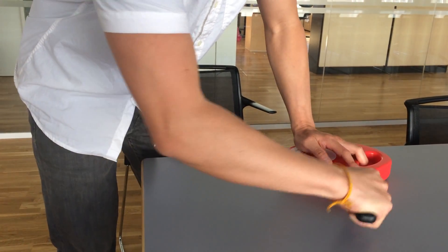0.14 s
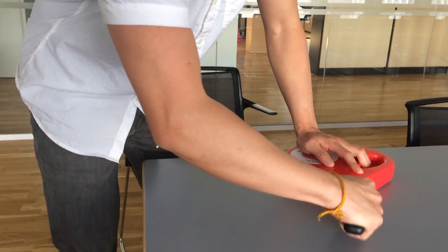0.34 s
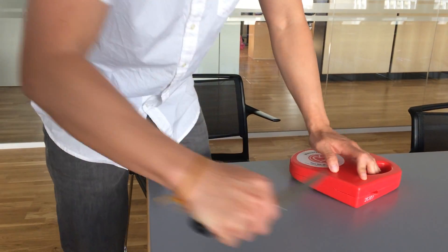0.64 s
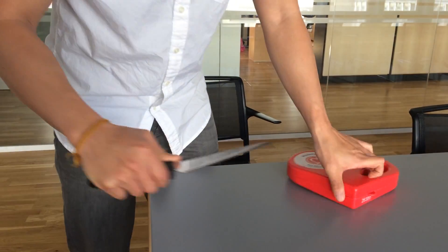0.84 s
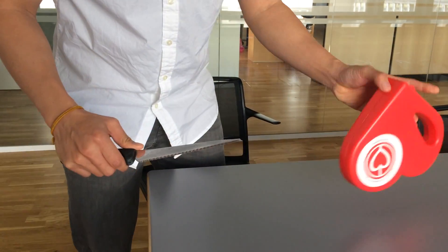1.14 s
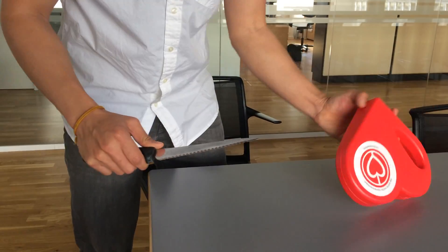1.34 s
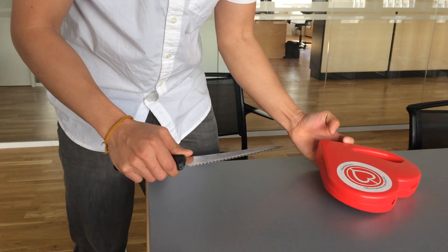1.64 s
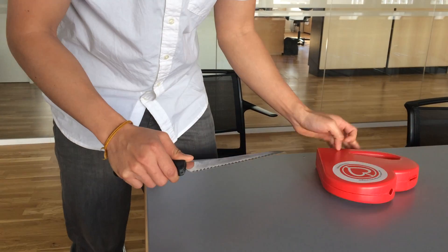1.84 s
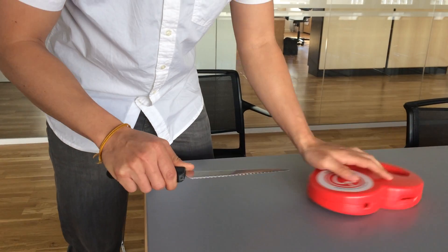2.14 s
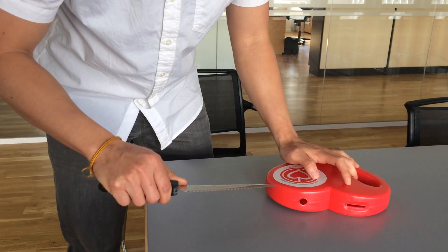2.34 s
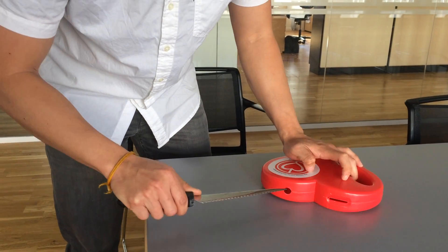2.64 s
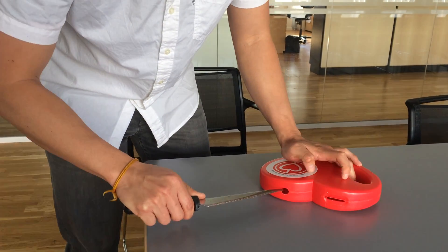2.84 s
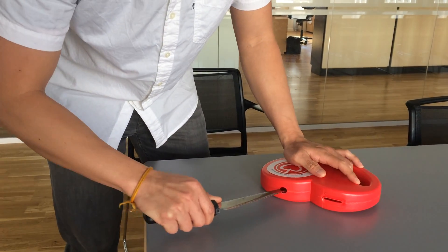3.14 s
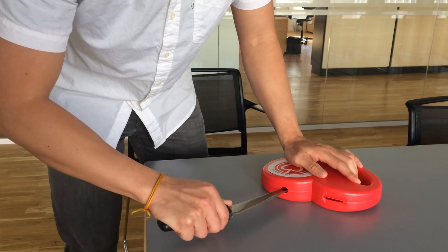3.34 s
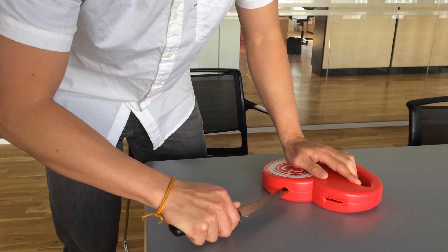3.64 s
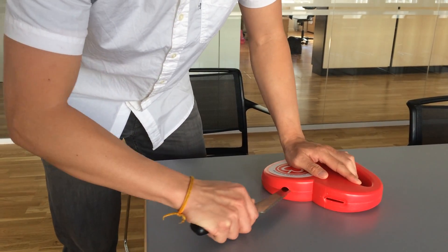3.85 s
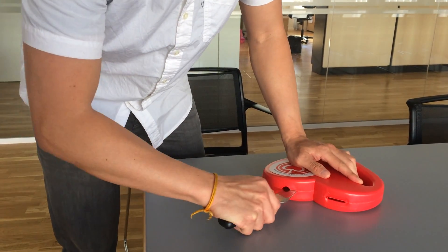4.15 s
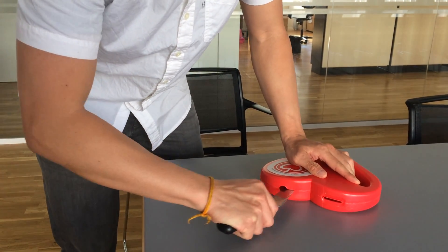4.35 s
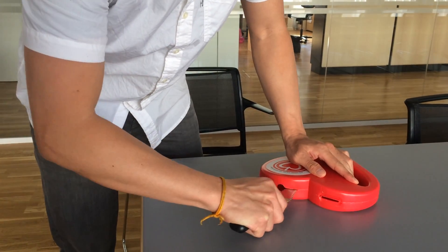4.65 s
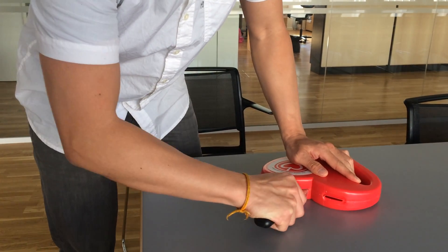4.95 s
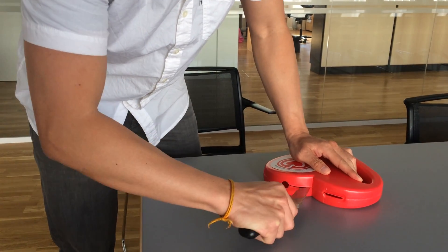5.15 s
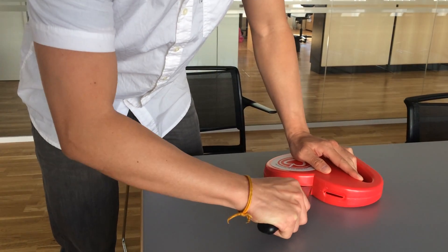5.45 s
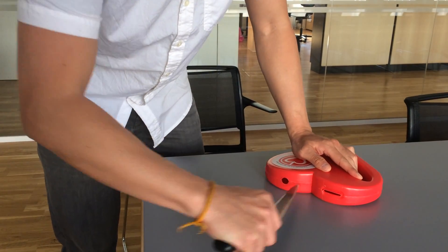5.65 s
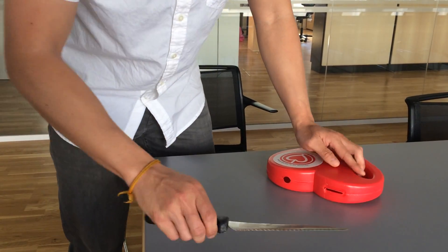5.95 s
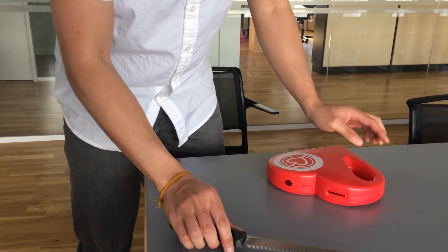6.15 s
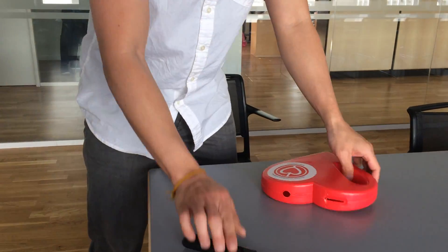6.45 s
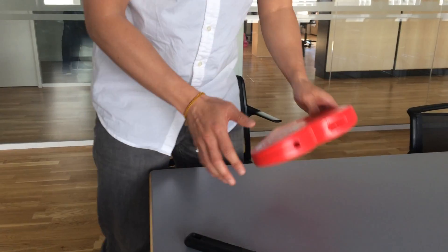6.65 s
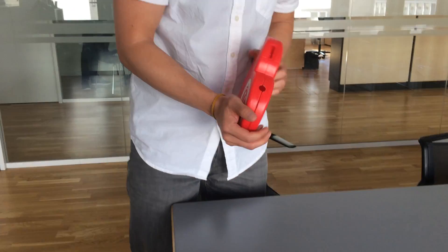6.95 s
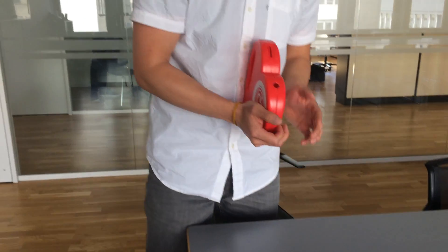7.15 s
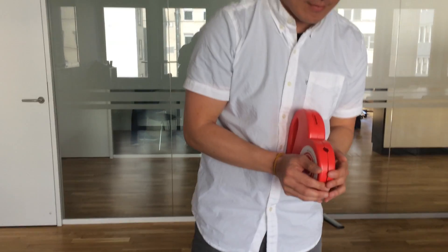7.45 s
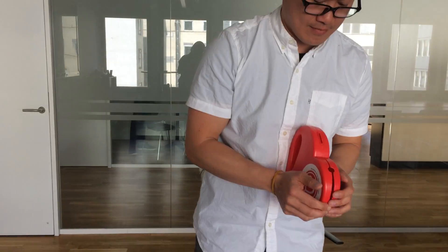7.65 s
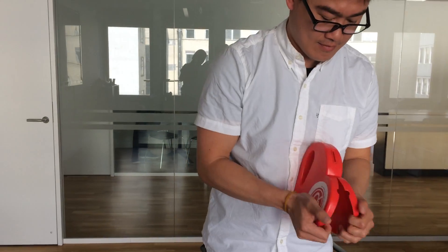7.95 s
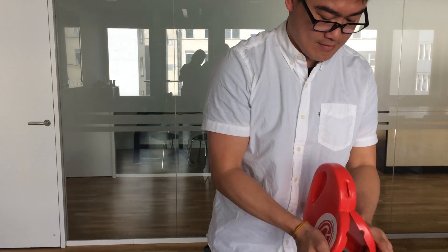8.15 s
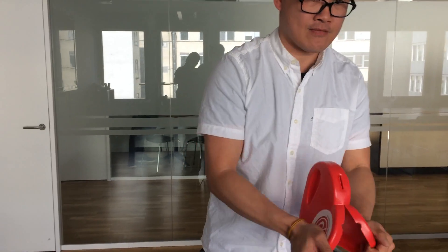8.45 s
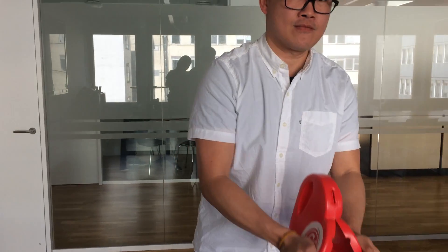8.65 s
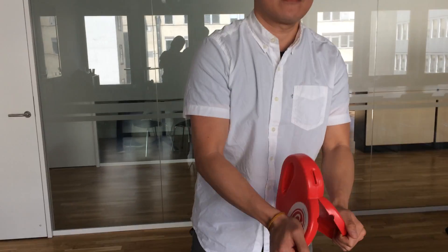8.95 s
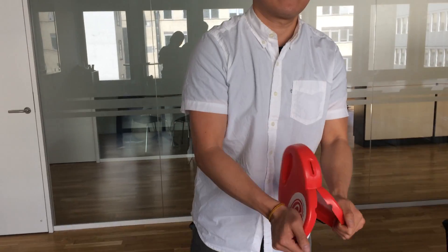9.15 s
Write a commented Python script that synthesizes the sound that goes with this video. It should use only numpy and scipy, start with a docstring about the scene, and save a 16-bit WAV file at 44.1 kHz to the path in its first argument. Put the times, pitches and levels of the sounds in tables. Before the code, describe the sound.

Close, dry sound in a quiet hard-walled office with faint low ventilation. From 0 to 0.6 s a serrated blade makes short gritty rasps in a hollow plastic sharpener, with clicks; the last pull is strongest and brightest. The case taps the table at 1.2, thuds hard at 1.45 and rocks in a rapid hollow clatter from 1.9 to 2.1. A soft swish follows at 2.3. Near-quiet until a faint creak and thin squeal around 3.2-3.4. At 3.9 the blade clacks home with a strong buzzing shudder, then soft uneven scrapes and dull bumps continue to 5.7, sharper at 5.17 and 5.72. A tap comes at 5.96; the knife drops and clanks at 6.4-6.5, the case drags briefly at 6.6 and clicks at 6.83. Faint finger rustles, small clicks and a strained hum lead to a startlingly loud, sharp plastic snap at 8.65, echoing briefly before quiet air.

```python
"""An office table in a hard-walled room: a serrated knife rasps in short strokes through a hollow plastic sharpener.
The case is knocked down, the blade catches and scrapes again, the knife is dropped, and the shells snap apart.
Random grains drive resonances for friction; impacts are a crack, a rattle and decaying modes;
the echo is decaying noise, the ventilation shaped noise."""
import sys
import numpy as np
from scipy import signal
from scipy.fft import rfft, irfft, next_fast_len
from scipy.io import wavfile
from scipy.ndimage import uniform_filter1d, minimum_filter1d

SR = 44100
rng = np.random.default_rng(int(sys.argv[2]) if len(sys.argv) > 2 else 0)


def log_audio(samples):
    """Write samples as a 16-bit WAV file to the path given in sys.argv[1]."""
    # one column per channel
    frames = np.atleast_2d(samples).T
    # limit to full scale, then quantise
    limited = np.clip(frames, -1, 1)
    pcm = np.round(limited * 32767).astype(np.int16)
    wavfile.write(sys.argv[1], SR, pcm)


N = 410571
TIME = np.arange(N) / SR

# ventilation spectrum: freq_hz, density_db_per_hz
AIR_SPECTRUM = [(25, -13.5), (65, 2), (130, 1.5), (330, -13.5), (750, -21), (2500, -30), (5000, -35),
                (16000, -40)]
AIR_DB = -58.5
# reverberation: freq_hz, t60_s
ROOM_T60 = [(100, 1), (500, 0.62), (2500, 0.59), (7000, 0.37)]

# faint creaks as the blade enters the slot, before CREAK_GAIN_DB: peak_s, length_s, level_db
CREAKS = [(3.22, 0.2, -58), (3.181, 0.032, -54.5), (3.246, 0.03, -51.5), (3.278, 0.037, -48)]
# creak resonances: freq_hz, width_hz, level_db
CREAK_MODES = [(990, 100, -2), (1750, 270, -0.5), (2540, 1200, -12), (3180, 73, -11)]
# thin squeal ending the creak, before CREAK_GAIN_DB: peak_s, length_s, level_db
SQUEALS = [(3.33, 0.59, -70.5)]
SQUEAL_HZ, SQUEAL_WIDTH_HZ = 1793, 130
CREAK_GAIN_DB = 5.0   # direct sound only

# hands, cloth or blade slide over the case, or the case over the table: peak_s, length_s, level_db
SLIDES = [(.53, 0.2, -46), (.965, 0.11, -53), (2.285, 0.23, -36.5), (2.52, 0.27, -58.5), (2.73, 0.21, -60),
          (6.61, 0.21, -55), (7.76, 0.076, -62), (7.99, 0.074, -59.5)]
# sliding spectrum: freq_hz, density_db_per_hz
SWISH_SPECTRUM = [(200, -16), (450, -10), (750, -15), (1150, -11), (6000, -22), (16000, -32)]
# fingers shift their grip on the lifted case: peak_s, length_s, level_db
FUMBLING = [(7.6, 5.3, -71)]
# the hollow case hums as its seam gives: peak_s, length_s, level_db
STRAINS = [(7.88, 0.14, -53)]
# hum resonances: freq_hz, width_hz, level_db
STRAIN_MODES = [(562, 39.4, 0.5), (1447, 300, -14)]
SPEED_WIDTH, SPEED_FLATNESS = 0.38, 3.2   # half width as share of length; exponent, above 2 = flat-topped

# hard landing, or blade home against its stop, shudders the case: start_s, level_db
SHUDDERS = [(.255, -33), (.277, -50), (1.47, -32.5), (1.97, -31), (3.915, -19.5)]
# case drags on the table with a low groan: peak_s, length_s, level_db
DRAGS = [(6.6, 0.11, -45)]
SHUDDER_RISE_S, SHUDDER_DECAY_S, JUDDER_LOWEST_HZ = 0.0008, 0.022, 198

# case lands and rocks to rest; thump is relative to the middle: start_s, level_db, thump_db, favoured_hz
KNOCKS = [(1.229, -32, -14, 640), (1.4441, -20.5, -4.5, 1440), (1.4497, -19.5, -6.5, 564),
          (1.468, -35.5, 4, 1100), (1.52, -31.5, 1.5, 900), (1.575, -45, 6.5, 1100),
          (1.734, -50.5, -9, 1089), (1.894, -27, -4.5, 1110), (1.915, -32, -7, 890),
          (1.9495, -19.5, 1, 414), (1.955, -21.5, -12, 614), (2.006, -23.5, 1, 437), (2.045, -25.5, 1, 577),
          (2.068, -35.5, 4.5, 706), (2.084, -44, 2, 590)]
# table-top resonances: freq_hz, level_db
TABLE_MODES = [(88, -12.5), (192.5, 0), (229, 0), (290, -5.5), (345, 1.5), (385, 2), (415, 6), (540, 7.5),
               (588, 6.5), (690, 4.5), (1075, 5), (1165, -5.5), (1434, -7), (1640, -3), (2404, -6),
               (3100, -9)]
KNOCK_PRESENCE_DB, KNOCK_TREBLE_DB = -13.5, -29   # hardest knock, against its middle
KNOCK_PRESENCE_DULLING, KNOCK_DULLING = 0.35, 0.8   # upper middle, treble: dB lost per dB softer

# knife drops flat, clanks, bounces, is let go: start_s, level_db, presence_db, favoured_hz
KNIFE_DROPS = [(6.404, -38, 6, 1190), (6.4201, -36, 6, 2190), (6.427, -29, -14, 1280),
               (6.463, -35, 3, 1720), (6.476, -33.5, -4, 900)]
# knife resonances: freq_hz, width_hz, level_db
KNIFE_MODES = [(197, 70, -2.5), (689, 78, 7.5), (920, 100, 4.5), (1065, 27, 0), (1270, 83, 3),
               (1715, 74, 0), (2180, 190, -1)]
KNIFE_THUMP_DB, KNIFE_TREBLE_DB = -6, -30.5   # bass against the middle, treble against the upper middle
TREMBLE_DB, TREMBLE_RISE_S, TREMBLE_DECAY_S = -9, 0.0019, 0.048   # level against each bounce

# blade and fingers click on the case: start_s, level_db, thump_db, presence_db, treble_db, favoured_hz
CLICKS = [(.239, -34.5, -1, -2.5, -15, 1310), (.251, -31.5, 0, -0.5, -7, 3800),
          (.6295, -35.5, -24, 0.5, -25, 1110), (.847, -38.5, -12, 1.5, -10, 1860),
          (3.286, -48.5, 1, 0.5, -30, 1910), (3.911, -23, -2, 0.5, -12.5, 3800),
          (3.99, -33.5, -2.5, -5.5, -41, 1260), (4.283, -37, -5, 5, -39, 2010),
          (5.075, -40, -0.5, -14, -33.5, 1070), (5.705, -39, -10.5, 9, -16, 1570),
          (5.962, -28, -11.5, -9, -36.5, 394), (6.8285, -30, 1.5, 1, -26.5, 1860),
          (7.4, -41, -10, -15.5, -44, 1146), (7.835, -38.5, -6.5, -4.5, -14, 530)]
# dull bumps as the hand's push changes: start_s, level_db
BUMPS = [(0.046, -46.5), (0.451, -43), (0.61, -43.5), (1.066, -50), (3.54, -60), (3.773, -45), (3.816, -46),
         (4.03, -46), (4.133, -46), (4.436, -48), (4.825, -55), (5.187, -39), (5.768, -48.5), (5.883, -45),
         (7.505, -53.5)]
BUMP_THUMP_DB, BUMP_PRESENCE_DB, BUMP_TREBLE_DB, BUMP_HZ = 1.5, -12.5, -56, 500
# nails and the parting seam tick on the plastic: start_s, level_db
TICKS = [(2.915, -64), (2.998, -63.5), (7.973, -55.5), (8.009, -58), (8.136, -61.5), (8.165, -64),
         (8.44, -68)]
TICK_THUMP_DB, TICK_PRESENCE_DB, TICK_TREBLE_DB, TICK_HZ = -16, -2, -15.5, 1400
# case resonances: freq_hz, level_db
CASE_MODES = [(147, -6), (229, -4.5), (315, -6), (392, 5.5), (545, -1.5), (697, -3), (1044, 1.5),
              (1165, -2), (1435, 3), (1760, -0.5), (1975, 5.5), (2390, 6.5), (3120, -1.5), (3385, 3),
              (3855, 4), (4118, -2)]

# catch lets go, shell springs out: start_s, level_db, thump_db, presence_db, treble_db, favoured_hz
SNAPS = [(8.6553, -4, -23.5, -5.5, -12, 1065)]
# shell resonances: freq_hz, level_db
SHELL_MODES = [(665, -1), (770, 2.5), (870, -5), (1025, -4), (1145, 3.5), (1260, -3), (2150, 14), (2700, 8),
               (3940, -3.5), (6250, 13)]
SHELL_WIDTH_HZ = 45   # least width: the hands damp the shell

# pulls and pushes of the blade, before SCRAPE_GAIN_DB: peak_s, length_s, level_db
STROKES = [(0.07, 0.11, -47.5), (0.244, 0.13, -45.5), (0.491, 0.098, -38.5), (0.561, 0.064, -30.5),
           (3.79, 0.079, -51), (3.898, 0.046, -50.5), (4.041, 0.29, -46), (4.297, 0.2, -56.5),
           (4.542, 0.21, -51.5), (4.76, 0.12, -54.5), (4.994, 0.17, -46.5), (5.168, 0.11, -36.5),
           (5.409, 0.14, -53), (5.681, 0.19, -56), (5.717, 0.094, -32.5)]
# blade rubs lightly in the slot, before SCRAPE_GAIN_DB: middle_s, length_s, level_db
RESTING = [(.25, 4.9, -64), (4.8, 1.29, -67)]
# blade resonances: freq_hz, level_db
BLADE_MODES = [(1435, 2.5), (1823, 7.5), (2427, -1.5), (3120, 5), (3195, 1), (3520, 4), (4119, -1.5),
               (4894, -11.5)]
# case drone resonances: freq_hz, width_hz, level_db
DRONE_MODES = [(211.4, 4.7, 2.5), (425.6, 33, 5), (644, 160, -5.5)]
# abrasive rasp spectrum: freq_hz, density_db_per_hz
RASP_SPECTRUM = [(400, -6), (800, -9), (1100, 1), (1500, -5), (2100, -5), (3900, -11), (5600, -19),
                 (7200, -25.5), (16000, -37)]
SCRAPE_GAIN_DB = 1.87
DRONE_DB = -0.5   # against the rasp, while the teeth grip
SKIM_ABOVE_DB, SKIM_LOSS = -37.5, 9.5   # faster strokes skim: stroke level, dB of drone lost per dB above
CATCHES_PER_S, CATCH_DB = 130, -9   # single teeth catch and let go; level against the steady rasp
CATCH_KNOCK_DB = -3.5   # catching teeth also knock the case; against the slips that drive its drone

# wandering colour, band centres: freq_hz
COLOUR_CENTRES_HZ = [500, 950, 1600, 2450, 3700, 6000]
COLOUR_WANDER_DB, COLOUR_TURNS_PER_S = 2.5, 45
# crossovers between bass, middle, upper middle and treble: freq_hz
BAND_EDGES_HZ = [450, 1400, 4500]
FAVOUR_DB, FAVOUR_OCTAVES = 7.5, 0.36   # the spot struck favours resonances near one pitch
TABLE_LOSS, CASE_LOSS, SHELL_LOSS, BLADE_LOSS = 0.066, 0.02, 0.051, 0.011   # added width per Hz of pitch
BLUR_ABOVE_HZ = 1600
CUTOFF_HZ, RELEASE_DB_PER_S = 16100, 30


def from_db(db):
    """Decibels to gain."""
    return 10 ** (np.asarray(db) / 20)


def rms_one(x):
    """Scale to unit power."""
    return x / np.sqrt(np.mean(x ** 2) + 1e-20)


def at_hz(points, hz):
    """Read a table on a log-frequency axis."""
    freqs, values = np.transpose(points)
    return np.interp(np.log(np.maximum(hz, 1)), np.log(freqs), values)


def butter(x, order, hz, kind):
    """Causal Butterworth filter."""
    return signal.sosfilt(signal.butter(order, hz, kind, fs=SR, output="sos"), x)


def coloured(x, spectrum):
    """Give a steady signal a spectrum that falls away below its first point; rms 1."""
    hz = np.arange(N // 2 + 1) * SR / N
    gain = from_db(at_hz(spectrum, hz)) * np.minimum(hz / spectrum[0][0], 1) ** 2
    return rms_one(irfft(rfft(x) * gain, N))


def drift(rate):
    """Random wander of rms 1 with about `rate` turns a second."""
    return rms_one(np.interp(TIME * rate, np.arange(N // 20), rng.standard_normal(N // 20)))


def split(x, edges):
    """Causal bands, lowest first; each crossover passes the rest on."""
    bands, rest = [], x + 1e-18
    for hz in edges:
        bands.append(butter(rest, 3, hz, "low"))
        rest = butter(rest, 3, hz, "high")
    return bands + [rest]


def damped(modes, loss, least_hz):
    """Give resonances their widths: higher ones die sooner."""
    return [(hz, least_hz + loss * hz, db) for hz, db in modes]


def resonate(x, modes):
    """Drive parallel two-pole resonances with a steady force; rms 1."""
    out = 0
    for k, (hz, width_hz, db) in enumerate(modes):
        r = np.exp(-np.pi * width_hz / SR)
        poles = [1, -2 * r * np.cos(2 * np.pi * hz / SR), r * r]
        out = out + (-1) ** k * from_db(db) * (1 - r * r) * signal.lfilter([1, 0, -1], poles, x)
    return rms_one(out)


def grains(per_s, spread_db):
    """Random tiny fractures of very uneven size."""
    sizes = from_db(spread_db * np.minimum(rng.exponential(1, N), 4)) * rng.choice([-1, 1], N)
    return sizes * (rng.random(N) < per_s / SR)


def friction(per_s, uneven_db):
    """Light sliding contact: fine grains under a slightly unsteady hand."""
    return grains(per_s, spread_db=2.0) * from_db(uneven_db * drift(90))


def movements(rows):
    """Gain of hand movements: speed rises and falls in a flat-topped bell."""
    gain = np.zeros(N)
    for s, length_s, db in rows:
        near = slice(max(int((s - length_s) * SR), 0), int((s + length_s) * SR))
        offset = np.abs((TIME[near] - s) / (SPEED_WIDTH * length_s))
        gain[near] += from_db(db) * np.exp(-offset ** SPEED_FLATNESS)
    return gain


def aftershakes(rows, rise_s, decay_s):
    """Gain of a shaking that each jolt starts and that then dies away."""
    gain = np.zeros(N)
    for s, db, *_ in rows:
        age = np.maximum(TIME - s, 0)
        gain += from_db(db) * (1 - np.exp(-age / rise_s)) * np.exp(-np.minimum(age / decay_s, 20))
    return gain


def wandering(x):
    """The contact point travels: overlapping bands swell and fade independently; rms 1."""
    size = next_fast_len(N)
    hz, spectrum = np.arange(size // 2 + 1) * SR / size, rfft(x, size)
    out = np.zeros(N)
    for share in np.eye(len(COLOUR_CENTRES_HZ)):
        weight = at_hz(list(zip(COLOUR_CENTRES_HZ, share)), hz)
        band = irfft(spectrum * weight, size)[:N]
        out += band * from_db(COLOUR_WANDER_DB * drift(COLOUR_TURNS_PER_S))
    return rms_one(out)


def crack(t, decay_s):
    """A contact holds all frequencies evenly; bending waves smear it over a few milliseconds."""
    fade = np.exp(-t / decay_s) * (1 - np.exp(-2 * t / decay_s))
    wave = rng.standard_normal(len(t)) * fade
    for _ in range(4):   # alternately flatten the spectrum and shorten the wave
        flat = irfft(np.exp(1j * np.angle(rfft(wave))), len(t))
        wave = flat * np.exp(-(t / decay_s / 4) ** 2)
    return wave * np.linalg.norm(fade) / np.linalg.norm(wave)


def blows(events, modes, crack_s, crack_db, rattle_s, rattle_db, swell_s, lowest_hz, contact_hz):
    """Each blow: a contact crack, a rattle of dense modes and the body's ring, levelled by band."""
    t, out = np.arange(SR // 4) / SR, np.zeros(N + SR)
    hz, width_hz, db = np.transpose(modes)[:, :, None]
    for s, level_db, thump_db, presence_db, treble_db, favoured_hz in events:
        spot_db = FAVOUR_DB * np.exp(-(np.log2(hz / favoured_hz) / FAVOUR_OCTAVES) ** 2)
        strength = from_db(db + spot_db + rng.normal(0, 1.5, db.shape)) * rng.choice([-1, 1], db.shape)
        pitch_hz = hz * rng.uniform(.99, 1.01, hz.shape)   # grip and resting place shift the modes
        ring = (strength * np.sin(2 * np.pi * pitch_hz * t) * np.exp(-np.pi * width_hz * t)).sum(axis=0)
        rattle = from_db(rattle_db) * np.exp(-t / rattle_s) * rng.standard_normal(len(t))
        body = (ring + rattle) * (1 - np.exp(-t / swell_s))   # takes a moment to get moving
        blow = body + from_db(crack_db) * crack(t, crack_s)
        bands = split(butter(blow, 2, [lowest_hz, contact_hz], "band"), BAND_EDGES_HZ)
        start = round(s * SR)
        for band_db, band in zip([thump_db, 0, presence_db, treble_db], bands):
            # levels are rms over the first 25 ms
            out[start:start + len(t)] += from_db(level_db + band_db) * band / np.std(band[:SR // 40])
    return out[:N]


def ventilation():
    """Steady air noise, strongest in the bass."""
    return from_db(AIR_DB) * coloured(rng.standard_normal(N), AIR_SPECTRUM)


def room(x, build_s, gap_s):
    """Diffuse echoes build up after a short gap and die soonest in the treble."""
    hz, t, echoes = signal.stft(rng.standard_normal(SR), SR)
    fading = echoes * from_db(-60 * t / at_hz(ROOM_T60, hz)[:, None])
    tail = signal.istft(fading, SR)[1][:SR]
    tail *= 1 - np.exp(-np.maximum(TIME[:SR] - gap_s, 0) / build_s)
    return signal.fftconvolve(x, tail / np.linalg.norm(tail))[:N]


def all_directions(x):
    """A click leaves with different peaks in each direction; at the walls its treble evens out."""
    body, treble = split(x, [BLUR_ABOVE_HZ])
    frames = signal.stft(treble, SR, nperseg=256)[2]
    power = np.abs(uniform_filter1d(np.abs(frames) ** 2, size=11, axis=0))   # smoothed over frequency
    phases = np.exp(2j * np.pi * rng.random(power.shape))
    spread = signal.istft(np.sqrt(power) * phases, SR)[1][:N]
    return body + rms_one(split(spread, [BLUR_ABOVE_HZ])[1]) * np.std(treble)


def creaking():
    """Uneven little slips ring a few resonances and trail off in a squeal."""
    slips = friction(per_s=1000, uneven_db=2.5)
    squeal = movements(SQUEALS) * resonate(slips, [(SQUEAL_HZ, SQUEAL_WIDTH_HZ, 0)])
    return movements(CREAKS) * resonate(slips, CREAK_MODES) + squeal


def sliding():
    """Dense fine grains give a soft swish that rises and falls with the speed of the slide."""
    swish = coloured(friction(per_s=7000, uneven_db=2.0), SWISH_SPECTRUM)
    return movements(SLIDES) * wandering(swish)


def fumbling():
    """Fingers rustle faintly on the plastic, and the strained case hums."""
    hum = movements(STRAINS) * resonate(friction(per_s=970, uneven_db=1), STRAIN_MODES)
    rustle = coloured(grains(per_s=1600, spread_db=2.5), RASP_SPECTRUM)
    return hum + movements(FUMBLING) * rustle


def shuddering():
    """Jolted or dragged, the case judders on the table top."""
    contacts = friction(per_s=2700, uneven_db=6.5)
    judder = resonate(contacts, damped(TABLE_MODES, TABLE_LOSS, least_hz=2))
    judder += from_db(-18.5) * coloured(contacts, RASP_SPECTRUM)
    shaking = aftershakes(SHUDDERS, SHUDDER_RISE_S, SHUDDER_DECAY_S) + movements(DRAGS)
    return shaking * butter(judder, 2, JUDDER_LOWEST_HZ, "high")


def table_knocks():
    """The case strikes the table top; the harder the knock, the brighter."""
    hardest_db = max(row[1] for row in KNOCKS)
    hits = []
    for s, db, thump_db, hz in KNOCKS:
        softer_db = hardest_db - db
        presence_db = KNOCK_PRESENCE_DB - KNOCK_PRESENCE_DULLING * softer_db
        treble_db = KNOCK_TREBLE_DB - KNOCK_DULLING * softer_db
        hits.append((s, db, thump_db, presence_db, treble_db, hz))
    return blows(hits, damped(TABLE_MODES, TABLE_LOSS, least_hz=1.6), crack_s=0.0029, crack_db=22.5,
                 rattle_s=0.0073, rattle_db=14, swell_s=0.0046, lowest_hz=86, contact_hz=8800)


def dropped_knife(soft_hz):
    """The knife bounces on the table, and its springy blade chatters softly after each bounce."""
    hits = [(s, db, KNIFE_THUMP_DB, presence_db, presence_db + KNIFE_TREBLE_DB, hz)
            for s, db, presence_db, hz in KNIFE_DROPS]
    bounces = blows(hits, KNIFE_MODES, crack_s=0.00071, crack_db=-10, rattle_s=0.0064, rattle_db=-0.5,
                    swell_s=0.00008, lowest_hz=190, contact_hz=5450)
    chatter = butter(friction(per_s=300, uneven_db=2), 1, soft_hz, "low")
    trembling = from_db(TREMBLE_DB) * aftershakes(KNIFE_DROPS, TREMBLE_RISE_S, TREMBLE_DECAY_S)
    return bounces + trembling * resonate(chatter, KNIFE_MODES)


def case_taps():
    """Sharp clicks, light ticks and dull bumps ring the same hollow case."""
    hits = list(CLICKS)
    hits += [(s, db, BUMP_THUMP_DB, BUMP_PRESENCE_DB, BUMP_TREBLE_DB, BUMP_HZ) for s, db in BUMPS]
    hits += [(s, db, TICK_THUMP_DB, TICK_PRESENCE_DB, TICK_TREBLE_DB, TICK_HZ) for s, db in TICKS]
    return blows(hits, damped(CASE_MODES, CASE_LOSS, least_hz=25.6), crack_s=0.002, crack_db=19.5,
                 rattle_s=0.011, rattle_db=3.5, swell_s=0.00027, lowest_hz=129.6, contact_hz=7740)


def snapping():
    """The released shell cracks and rings, heavily damped, in one direction."""
    return blows(SNAPS, damped(SHELL_MODES, SHELL_LOSS, least_hz=SHELL_WIDTH_HZ), crack_s=0.0017,
                 crack_db=15.0, rattle_s=0.0094, rattle_db=0, swell_s=0.0007, lowest_hz=417, contact_hz=6380)


def snap_at_walls():
    """The snap leaves in several directions, each with its own mix of resonances."""
    return all_directions(sum(snapping() for _ in range(3)))


def rasp(teeth_per_s, chatter_db, blade_db, jerk_db):
    """Teeth jerk over the abrasive; grit rings the blade, coarser slips make the hollow case drone."""
    tooth_phase = np.cumsum(teeth_per_s * from_db(2.9 * drift(25))) / SR
    bite_db = chatter_db * np.cos(2 * np.pi * tooth_phase) + jerk_db * drift(160) + 0.4 * drift(45)
    bite = from_db(bite_db)
    grit = coloured(grains(per_s=7000, spread_db=3.2) * bite, RASP_SPECTRUM)
    catches = grains(per_s=CATCHES_PER_S, spread_db=7.5)
    blade_force = grains(per_s=2100, spread_db=7.0) * bite
    blade = resonate(blade_force, damped(BLADE_MODES, BLADE_LOSS, least_hz=10))
    caught = from_db(CATCH_DB) * coloured(catches, RASP_SPECTRUM)
    steel = wandering(grit + from_db(blade_db) * blade + caught)
    slips = rms_one(grains(per_s=500, spread_db=2.5) * bite)
    drone = resonate(slips + from_db(CATCH_KNOCK_DB) * rms_one(catches), DRONE_MODES)
    grip = [(s, length_s, db + DRONE_DB - SKIM_LOSS * max(db - SKIM_ABOVE_DB, 0))
            for s, length_s, db in STROKES]
    return steel * (movements(STROKES) + movements(RESTING)) + drone * movements(grip)


def scene():
    """All the handling, its echo and the ventilation; the creak is heard with much echo."""
    air = ventilation()
    creak = creaking()
    handling = sliding() + fumbling() + shuddering() + table_knocks() + dropped_knife(soft_hz=1780)
    taps = case_taps()
    snap = snapping()
    scrape = from_db(SCRAPE_GAIN_DB) * rasp(teeth_per_s=140, chatter_db=-1.0, blade_db=-6.0, jerk_db=2.5)
    to_walls = from_db(-2.5) * creak + from_db(-13.5) * handling
    to_walls += from_db(-16.5) * all_directions(taps)
    to_walls += from_db(-17.0) * snap_at_walls()
    to_walls += from_db(-20.5) * scrape
    echo = room(to_walls, build_s=0.00094, gap_s=0.0073)
    return (air + echo + from_db(CREAK_GAIN_DB) * creak + handling + taps + snap + scrape)[None]


def limiter(x, ceiling_db, release_db_per_s):
    """Peaks over the ceiling pull the gain down within about 1 ms; it creeps back afterwards."""
    over_db = np.maximum(20 * np.log10(np.abs(x).max(axis=0) + 1e-9) - ceiling_db, 0)
    recovery_db = release_db_per_s * TIME
    held_db = np.maximum.accumulate(over_db + recovery_db) - recovery_db
    return x * from_db(uniform_filter1d(minimum_filter1d(-held_db, size=45), size=45))


def record(dry):
    """A small microphone loses the deep bass; a limiter catches the snap; the top is cut."""
    thin = butter(dry, 1, 45, "high")
    limited = limiter(thin, ceiling_db=-1.0, release_db_per_s=RELEASE_DB_PER_S)
    return signal.sosfilt(signal.ellip(10, .1, 80, CUTOFF_HZ, fs=SR, output="sos"), limited)


dry = scene()
out = record(dry)
log_audio(out)
```